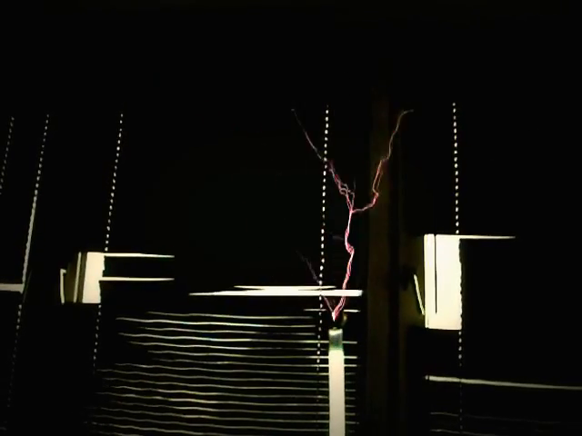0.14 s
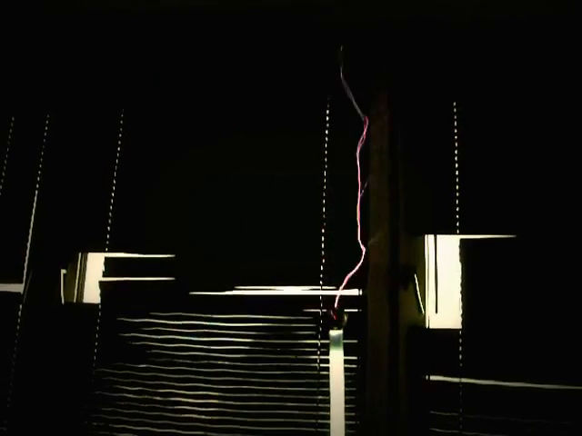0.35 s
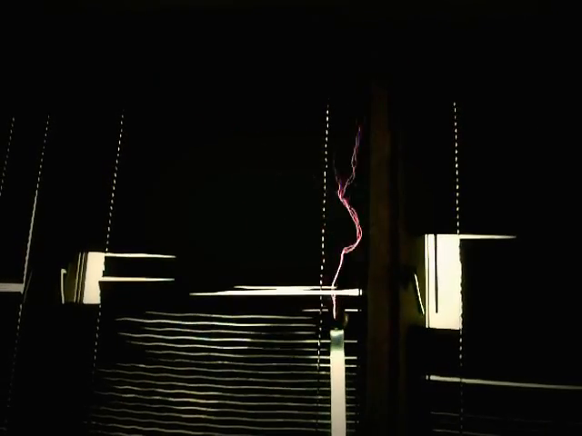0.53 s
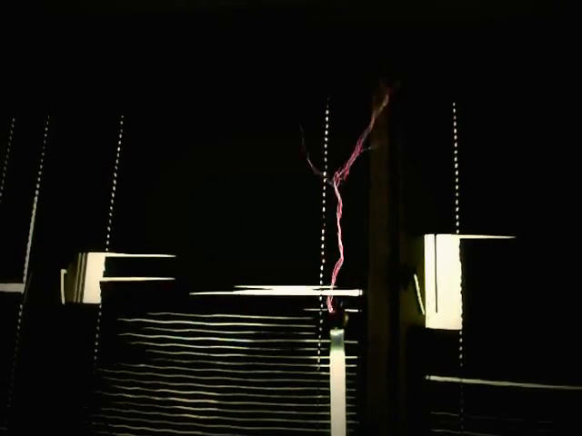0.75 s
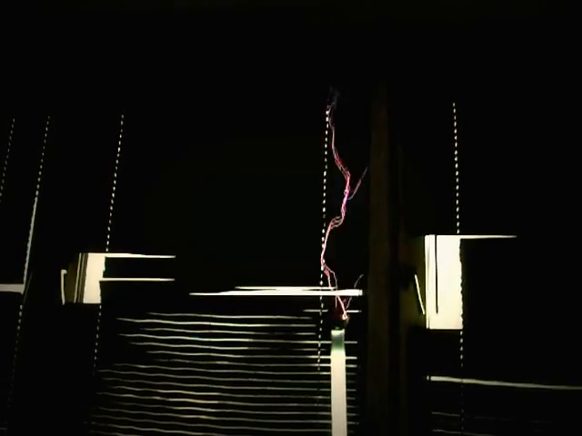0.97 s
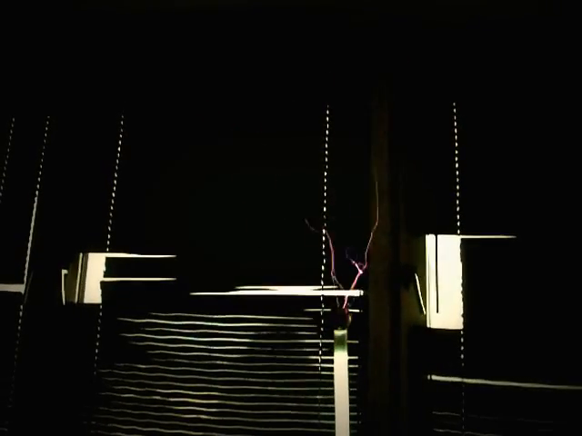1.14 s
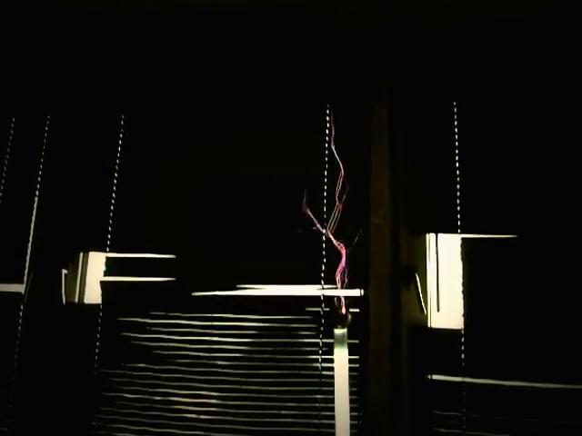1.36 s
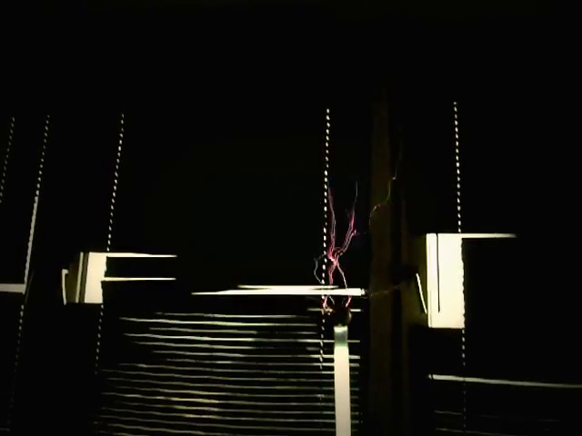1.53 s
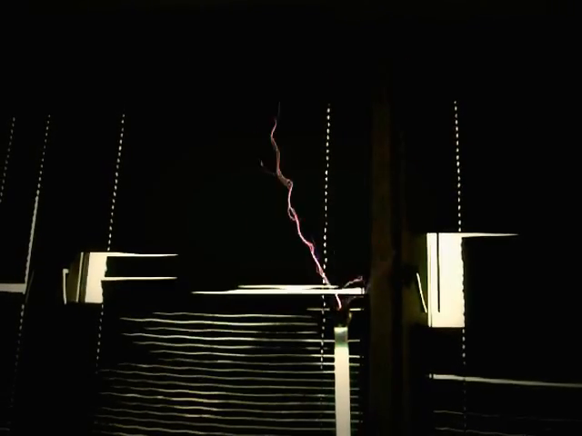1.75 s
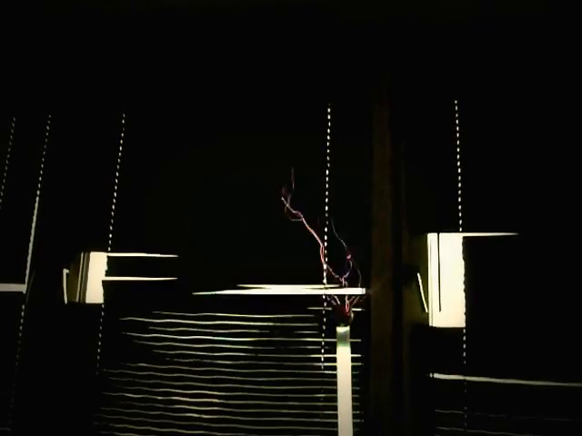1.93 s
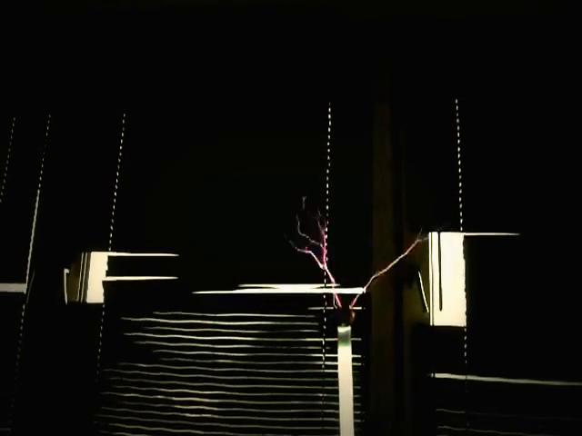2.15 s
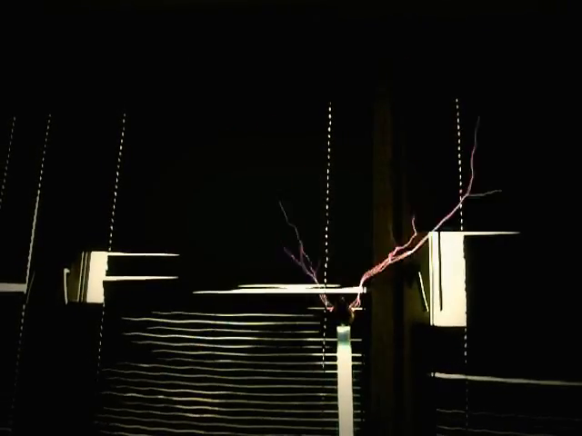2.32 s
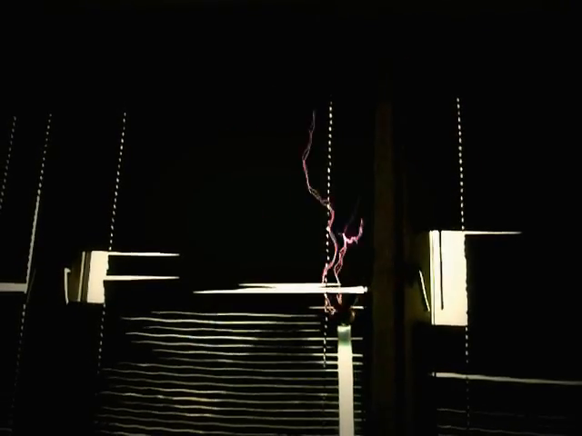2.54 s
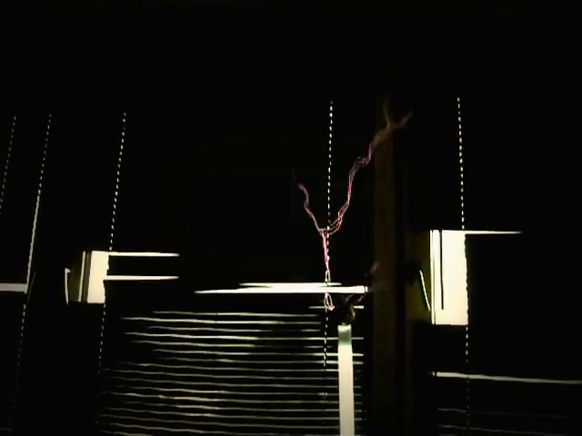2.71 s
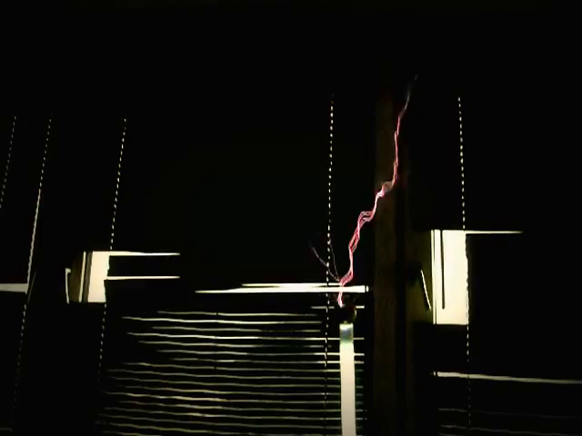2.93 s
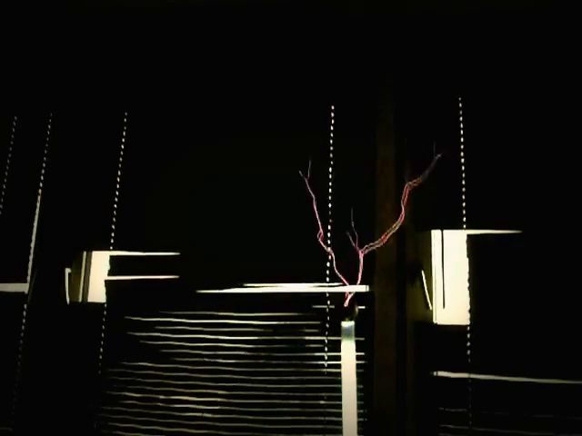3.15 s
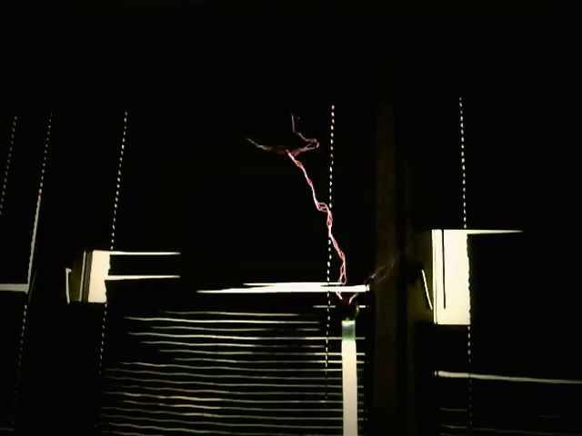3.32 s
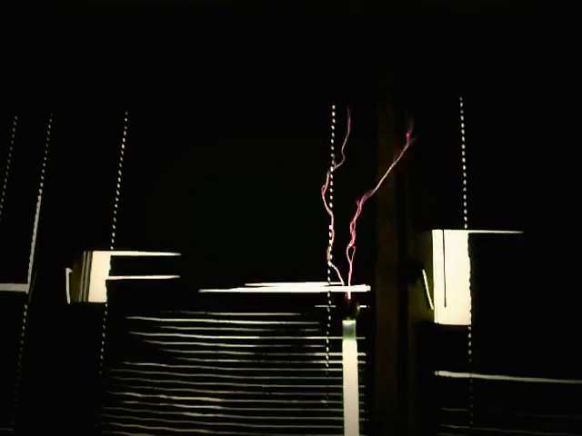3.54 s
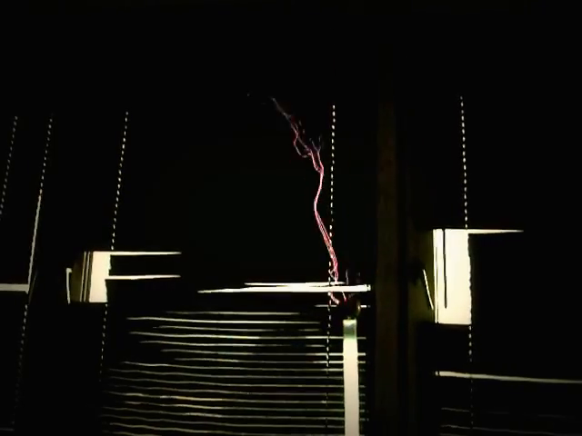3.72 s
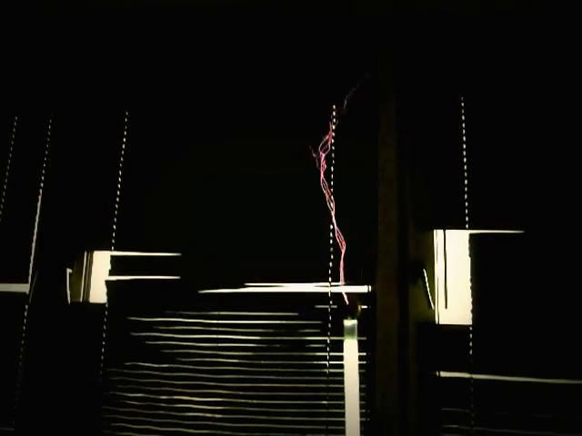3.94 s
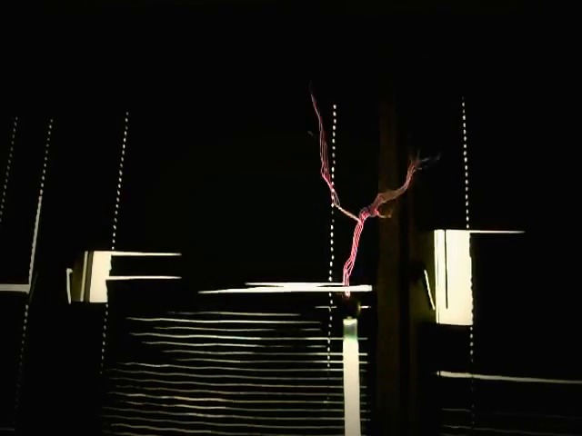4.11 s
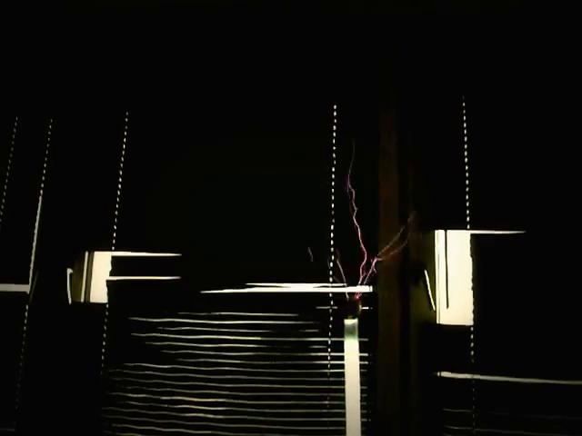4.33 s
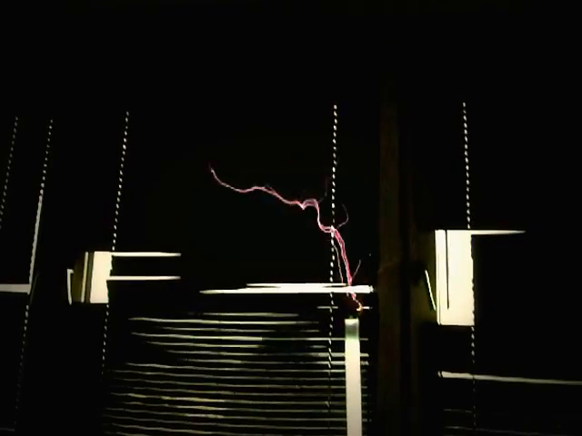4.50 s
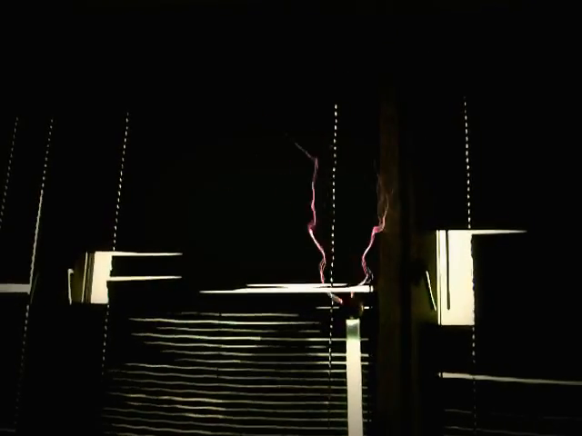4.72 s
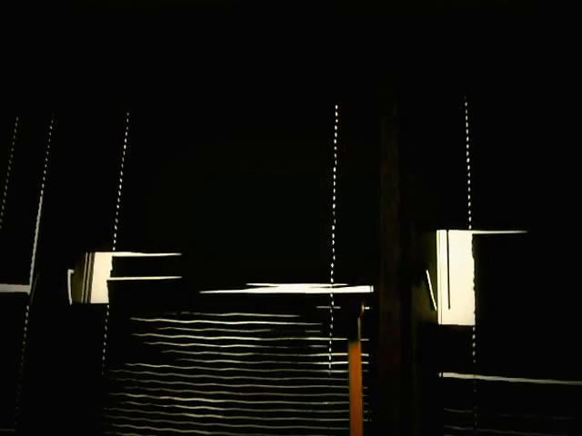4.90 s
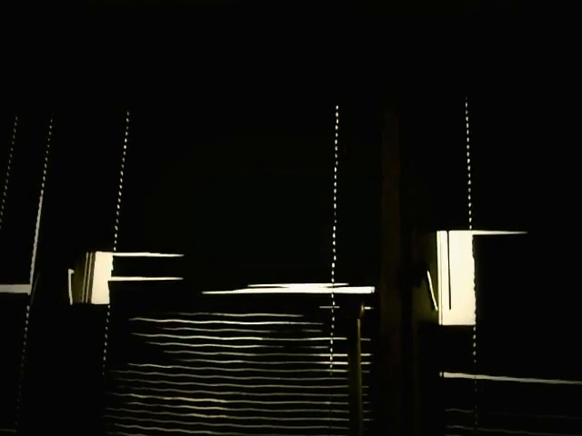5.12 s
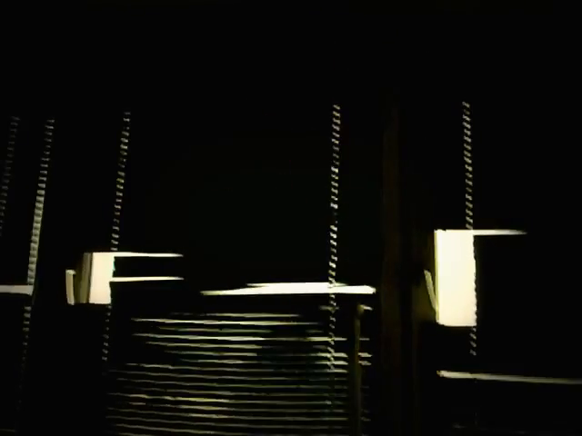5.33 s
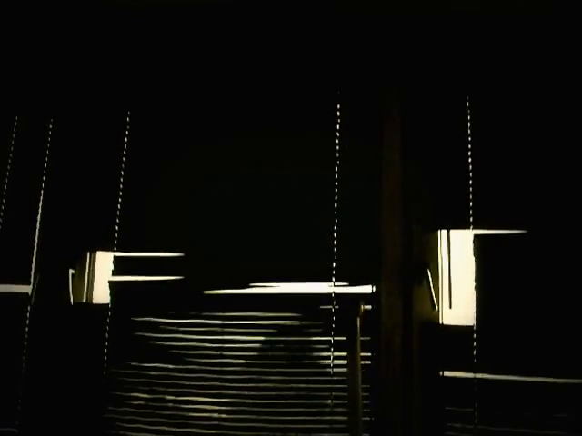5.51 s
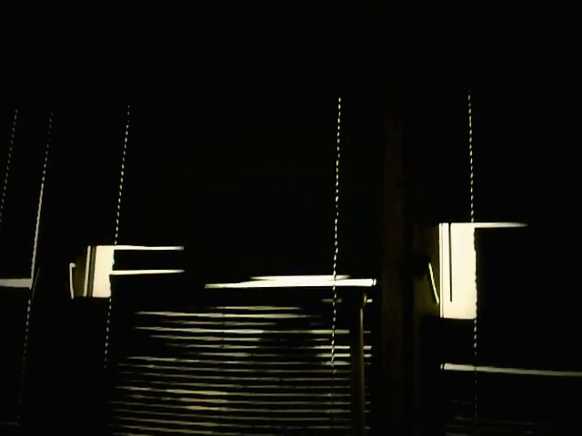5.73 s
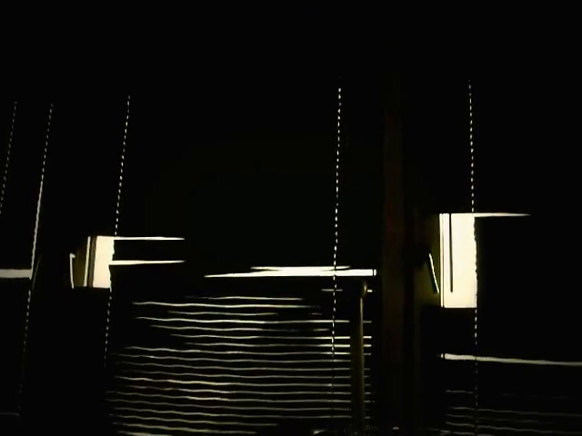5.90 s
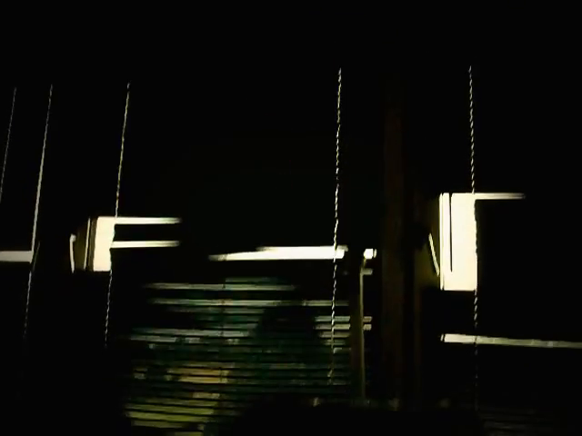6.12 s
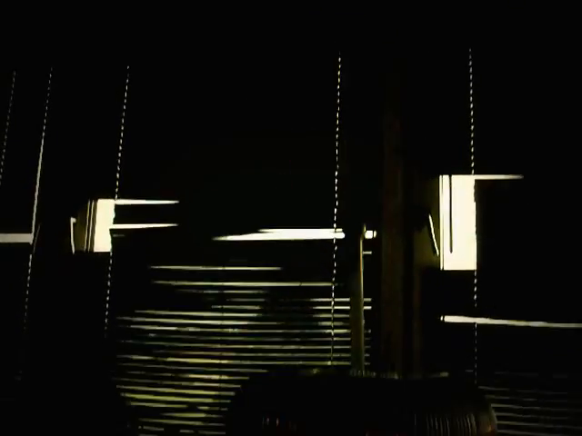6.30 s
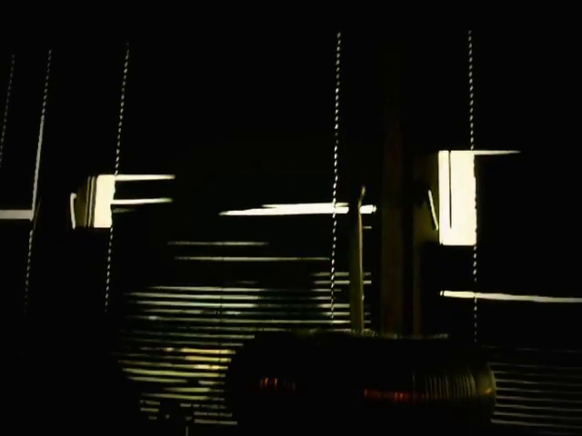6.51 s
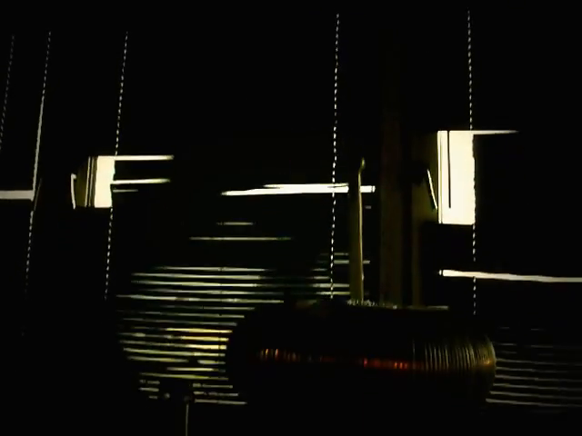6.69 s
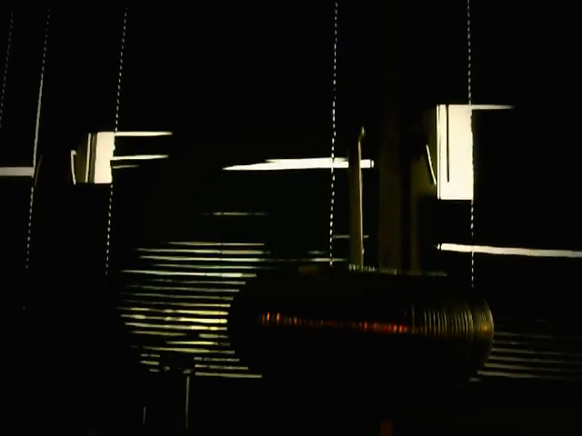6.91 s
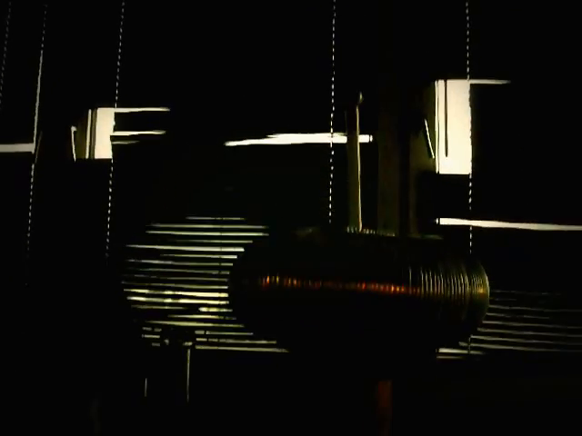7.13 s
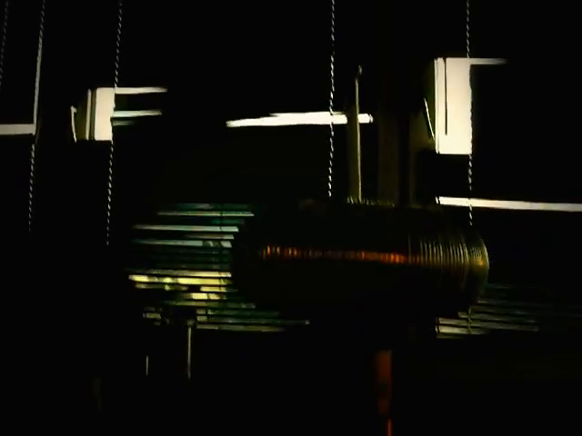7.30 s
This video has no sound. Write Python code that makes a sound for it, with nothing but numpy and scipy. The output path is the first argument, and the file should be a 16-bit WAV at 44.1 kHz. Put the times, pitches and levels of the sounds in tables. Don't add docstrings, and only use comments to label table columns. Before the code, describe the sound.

A homemade high-voltage coil throws branching sparks indoors. From the start a continuous raw buzz, a hundred sharp bangs a second, rasps with bright treble, flaring into hard cracks and sinking to a hissy blur as the streamers swing. Just before five seconds it is switched off; a brief reverberant tail dies, leaving only faint electronic hiss and a low flutter. Small hard-walled room, single microphone, peaky treble, no sound at the very top.

```python
import sys
import numpy as np
from scipy import signal
from scipy.fft import rfft, irfft, next_fast_len
from scipy.io import wavfile
from scipy.ndimage import uniform_filter1d

SR = 44100
rng = np.random.default_rng(int(sys.argv[2]) if len(sys.argv) > 2 else 0)


def master_out(mix):
    frames = np.transpose(np.atleast_2d(mix))
    ceiling = np.clip(frames, -1, 1)
    pcm = np.round(ceiling * 32767).astype(np.int16)
    wavfile.write(sys.argv[1], SR, pcm)


def invert_db(level):
    return 10 ** (np.asarray(level, dtype=float) / 20)


N = 324248
PULSE_SAMPLES, LEAD_SAMPLES = 1024, 64


def evened(x):
    return x / np.sqrt(np.mean(x ** 2) + 1e-20)


def read(points, hz):
    f, value = np.transpose(points)
    return np.interp(np.log(hz + 1), np.log(f + 1), value)


def causal(db):
    log_gain = np.log(invert_db(np.maximum(db, -70)))
    circle = np.concatenate([log_gain, log_gain[-2:0:-1]])
    return np.exp(np.conj(signal.hilbert(circle)))[:len(db)]


def delay(ms, hz):
    return np.exp(-2j * np.pi * hz * np.asarray(ms)[..., None] / 1000)


def during(t, start, length, edge):
    return (np.tanh((t - start) / edge) - np.tanh((t - start - length) / edge)) / 2


def place(times, spectra):
    nearest = np.round(times * SR)
    fraction_ms = (times * SR - nearest) / SR * 1000
    spectra = spectra * delay(fraction_ms, np.fft.rfftfreq(PULSE_SAMPLES, 1 / SR))
    pulses = np.roll(irfft(spectra, PULSE_SAMPLES), LEAD_SAMPLES, axis=1)
    at = nearest.astype(int)[:, None] + np.arange(PULSE_SAMPLES) + SR - LEAD_SAMPLES
    return np.bincount(at.ravel(), pulses.ravel(), N + SR)[:N + SR]


# start_s, length_s, gain_db, treble_gain_db
SWINGS = [(0.2, 0.099, 2.5, -3), (0.335, 0.3, 10.5, -10.5), (0.616, 0.25, 7.5, -4), (0.744, 0.062, 0.5, 12),
          (0.872, 0.12, 11.5, 2.5), (0.993, 0.14, 10, 2), (1.08, 0.11, 7, 1), (1.232, 0.15, 2, -0.5),
          (1.433, 0.13, 5, 10), (1.657, 0.19, 10.5, 3), (1.852, 0.24, 8, 2), (2.082, 0.34, 7.5, -3),
          (2.439, 0.2, 4.5, 7), (2.649, 0.13, 5.5, -2), (2.874, 0.15, -1, 5), (3.038, 0.2, 3.5, 2.5),
          (3.254, 0.29, 0, 4), (3.549, 0.12, 3.5, 2.5), (3.681, 0.38, 6.5, 5.5), (4.056, 0.064, 13, 6),
          (4.128, 0.27, 10, 6), (4.409, 0.065, 5, 0.5), (4.625, 0.23, 0.5, -2.5), (4.869, 0.113, 5.5, 16.5)]
TURN_S, ARCH = .013, 0.32


def facing(slots):
    start, length, *gains_db = np.transpose(SWINGS)
    start, length = start[:, None], length[:, None]
    arch = 1 + ARCH * (1 / 3 - np.clip(2 * (slots - start) / length - 1, -1, 1) ** 2)
    return np.array(gains_db) @ (arch * during(slots, start, length, TURN_S))


# start_s, loss_db
MISFIRES = [(0.19, -3), (0.28, -8), (0.3, -13), (0.31, -4), (0.36, 0.5), (0.54, -3), (0.6, -5), (0.61, 0.5),
            (0.73, -0.5), (0.86, -4), (0.89, 2), (1.02, 0), (1.11, -1), (1.2, -6), (1.21, -7), (1.4, -7.5),
            (1.54, -3.5), (1.55, -7), (1.6, -3.5), (1.61, -5), (1.63, -4.5), (1.83, -5.5), (2.01, -6),
            (2.02, -5.5), (2.24, -7), (2.3, -6.5), (2.5, 0.5), (2.55, -6), (2.56, -3), (2.76, -4),
            (3.02, -6), (3.1, -2), (3.6, -4.5), (4.04, -5), (4.09, -4), (4.26, -11), (4.37, -5.5),
            (4.39, -9.5), (4.4, -10), (4.64, -5.5), (4.69, -5)]
# start_s, strength_db, treble_lift_db
CRACKS = [(0.2306, -30, 1.5), (0.3809, -27.5, -5), (0.3913, -29.5, -0.5), (0.5518, -28, -3),
          (0.7515, -28.2, 5), (0.7612, -26, 1.5), (0.7718, -27, -2), (0.7813, -29, 6),
          (0.7906, -28.5, -1), (0.8016, -26, -3), (0.8116, -27, -2), (0.941, -26, -5),
          (1.001, -28.5, 4.9), (1.0116, -30.5, 2.5), (1.091, -25.5, -0.5), (1.1014, -26, -2.5),
          (1.1218, -25.5, -5.5), (1.1308, -26.5, -6), (1.1614, -28.5, 3), (1.172, -27, 0.5),
          (1.4612, -28.5, -3), (1.4813, -27.5, 1.3), (1.4907, -28.9, 1.0), (1.5119, -28, 2.8),
          (1.5213, -29.5, -1.5), (1.6517, -31, -1.5), (1.6908, -23, -12), (1.7016, -26, 2.5),
          (1.7111, -27.5, -1.5), (1.721, -26, -7.0), (1.731, -26.5, -4), (1.742, -23.5, -7),
          (1.7513, -23, -6.5), (1.7609, -22.5, -5), (1.7713, -27.5, -2), (1.7813, -22, -5),
          (1.7914, -23, -3.0), (1.8014, -23.5, -5), (1.811, -26.5, -6), (1.821, -26, -1),
          (1.8412, -24.5, -3), (1.8516, -24, -7.4), (1.8809, -25.3, -6.5), (1.9017, -27.5, -2.5),
          (1.9117, -25.5, -4), (1.922, -26.5, -5.5), (1.9316, -23.5, -8.0), (1.941, -25, -3.5),
          (1.9507, -24.5, -3), (1.9611, -23.5, -2.8), (1.972, -26.5, -1.7), (1.981, -25.5, -0.3),
          (1.992, -23, -8.0), (2.002, -26.5, -4), (2.0314, -23, -6.0), (2.052, -27.5, -1),
          (2.2718, -30.5, 3.5), (2.6727, -25.1, -7.3), (2.6817, -25.5, -7.5), (2.6917, -22.5, -3),
          (2.701, -25, -3), (2.7124, -24.5, -5), (2.7216, -28.5, -0.5), (2.7518, -27.0, -4),
               (3.0411, -29, -2.5), (3.051, -26, -5), (3.0608, -25, -5), (3.0716, -33, 5.8),
               (3.1117, -33, 4), (3.1215, -29, 0.4), (3.1618, -26, -11.5), (3.1713, -27, -0.2),
               (3.192, -38.5, 15.5), (3.2918, -30, 4), (3.6919, -31, 4), (3.712, -37, 14),
               (3.742, -32.5, 4), (3.7716, -26.8, 0), (3.7806, -25, -3.5), (3.792, -28, -2),
               (3.8018, -30.5, 2.1), (3.821, -29.5, 2.5), (3.8309, -29.5, -0.7), (3.8418, -27.2, 2),
               (3.8519, -27.8, 2.2), (3.8614, -30.5, 6), (3.872, -29.5, 1), (3.8812, -28, 3.2),
               (3.9409, -31.9, 7.2), (3.952, -30.5, 5.5), (3.971, -34.5, 11), (3.981, -29, 5),
               (4.0016, -31.5, 6.5), (4.0116, -32.5, 8), (4.0815, -29.0, 1.5), (4.1015, -30.5, 5),
               (4.1124, -33.5, 7.5), (4.1218, -29, 3.5), (4.1319, -28.5, 2.5), (4.1415, -23.5, -1.5),
               (4.1508, -28, 2.5), (4.1615, -26.5, -1.6), (4.1825, -25, -2), (4.1917, -24, -3.5),
               (4.201, -25, -3), (4.212, -25, -0.7), (4.2417, -25, -5.5), (4.2722, -23, -2),
               (4.2812, -22.5, -6.5), (4.2916, -26, -5.5), (4.3023, -24.5, -3), (4.3108, -25, -7.5),
               (4.3214, -24.1, -10), (4.3318, -24.5, -7.5), (4.3421, -23, -2.5), (4.3521, -26.5, -3.5),
               (4.3616, -23.5, -4), (4.3815, -28.5, 2), (4.652, -32, 8.5), (4.6615, -30.5, 6),
          (0.1111, -36, -1), (0.1718, -36, 4.5), (0.2517, -31.5, 1.5), (0.2608, -31.4, 2.5),
               (0.271, -32, -5), (0.3314, -36.5, 3.5), (0.3407, -36, 6), (0.351, -32, 1.4),
               (0.3723, -32, -9.5), (0.401, -26.5, -3), (0.4111, -24.5, -5.5), (0.4212, -27, 0.6),
               (0.432, -25.5, -7.5), (0.4406, -27, -1.0), (0.4513, -25.6, -6), (0.461, -25, -10.5),
               (0.4716, -29.5, -15), (0.4814, -28.5, -7), (0.4912, -24.5, -12.8), (0.502, -30, -8.5),
               (0.5116, -28, -5), (0.5209, -27.5, -10.5), (0.531, -27, -12.5), (0.5614, -29, -5),
               (0.5708, -28.5, -8.5), (0.5816, -28, -5), (0.6213, -34.5, 5), (0.6515, -27.5, -10.5),
               (0.6606, -33, -6), (0.6702, -28.5, -6.6), (0.6819, -27.5, -3.5), (0.6912, -30, -2.5),
               (0.702, -32.5, -3.5), (0.7109, -27.5, -3), (0.7217, -31.5, -1.8), (0.7413, -29.5, -2),
               (0.8208, -30.5, -9.5), (0.8321, -30, 1), (0.881, -29.5, 3), (0.901, -30, -4),
               (0.912, -27.5, -6), (0.9212, -23.5, -9), (0.9309, -22, -3), (0.951, -28, -6),
               (0.9612, -34, 1), (0.9717, -25.5, -2.4), (0.981, -29.1, -0.5), (0.9926, -30.5, -1),
               (1.0316, -29, 0.5), (1.0515, -30, 2.5), (1.0614, -31, 6), (1.0742, -27.5, 3),
               (1.079, -30.2, 2.1), (1.1518, -29.5, -0.8), (1.2213, -33.5, 3.5),
          (1.2713, -29, -5), (1.332, -30.5, -4), (1.3614, -32.6, 3.6), (1.4408, -29, -11),
                (1.452, -32, 0), (1.4713, -34, 3), (1.5009, -28.5, -2.1), (1.5318, -29.5, 4.5),
                (1.6212, -29, -1.4), (1.671, -27.2, -7), (1.6813, -28.5, -3.5), (1.8613, -27.4, -5.5),
                (1.8717, -26.5, -7.5), (1.8912, -32.5, 2.5), (2.042, -30.5, -4.5), (2.0616, -26.5, -9.8),
                (2.0711, -28, -2.5), (2.102, -28, -0.5), (2.1115, -31.5, 2.5), (2.122, -27, -3.0),
                (2.1419, -28, -4.1), (2.151, -29.5, 3.5), (2.1611, -34, 3.5), (2.171, -35, 5.8),
                (2.2119, -26, -6), (2.2605, -31.6, -0.2), (2.2927, -26, -3.9), (2.3618, -26.5, -7.5),
                (2.4008, -33, 1), (2.421, -33, -3.5), (2.432, -28.5, 1), (2.4514, -31, 4), (2.4618, -32, 3),
                (2.4807, -38, 12), (2.4918, -34.6, 8), (2.5122, -33.5, 4), (2.5317, -29.5, 3),
                (2.592, -38, 13.5), (2.6611, -27, -3.5), (2.7318, -26.5, -10), (2.7418, -30.5, -2),
                (2.7714, -28, -5.5), (2.8014, -38, 14.4), (2.8113, -34.5, 8), (2.9019, -30, 0),
                (2.9313, -35.5, 1.4), (2.941, -33.5, 5), (2.9617, -34.5, 7), (2.9717, -32, 5.2),
                (2.9816, -29.5, -1), (2.991, -29, -1.8), (3.0019, -37, 5), (3.0111, -31.5, 2),
                (3.0812, -32.5, -6), (3.0914, -29, -4),
          (3.1307, -29.6, -1.7), (3.1417, -28.0, -2), (3.1521, -28.5, -1), (3.202, -31, -2.0),
              (3.2318, -32.5, 5), (3.241, -39.5, 10.0), (3.262, -30.5, 3.5), (3.2717, -33, 4.5),
              (3.2816, -31.0, 2.3), (3.3012, -35, 11.5), (3.3126, -34.5, 6), (3.3203, -32.5, 2),
              (3.3318, -34, 4), (3.342, -40.5, 13.5), (3.3617, -33.5, 5.7), (3.3713, -31, 3),
              (3.3812, -35.5, 3.5), (3.3916, -31.5, 2.5), (3.402, -33, 2.5), (3.4121, -32, 3),
              (3.421, -33.5, 3.5), (3.4318, -36.5, 9), (3.4414, -32, 3), (3.4614, -34, 3),
              (3.4818, -34.5, 4), (3.511, -37.5, 8), (3.5301, -36.5, 8), (3.5714, -33.5, 5),
              (3.5803, -34.5, 5), (3.6604, -31, 0.5), (3.6816, -33, 5), (3.702, -34, 5.5),
              (3.7216, -29.5, 6), (3.7319, -27.5, 1), (3.7515, -29.5, 0.5), (3.762, -27, -3.3),
              (3.891, -30.5, 0.4), (3.9214, -28, -2.1), (3.9315, -30.7, 3.5), (3.9616, -36.2, 10.5),
              (3.9917, -31, 4.5), (4.022, -32, 6.1), (4.0322, -29.5, 6.1), (4.0718, -32.5, 2.0),
              (4.4106, -32, 1), (4.4212, -28.5, -5.8), (4.4433, -28.5, -10), (4.622, -35.6, 6.5),
              (4.7729, -30, 3), (4.8113, -29.5, 0.3), (4.8218, -33.5, 7), (4.8408, -31, 4),
              (4.8526, -33.5, 4), (4.8612, -37.5, 6.5), (4.8714, -31.5, 2)]
# start_s, strength_db, treble_lift_db, push_db
FAT_STRIKES = [(1.1411, -23.5, -3, -58.5), (3.1805, -32, 4.5, -65), (4.1715, -26, -1, -76),
               (3.9016, -26.5, 3, -44.5), (3.9124, -26, 3.5, -46.5), (4.2215, -26.5, 1.5, -50),
               (4.2314, -26, 2.5, -39.5), (4.2519, -28, 5.5, -45.5), (4.8814, -38.5, 11, -65.5),
               (4.8916, -35, 10, -42), (4.9015, -28.5, 5, -56.5), (4.9115, -28, 5, -37),
               (4.9219, -26.5, 4.5, -35), (4.9326, -22.5, -1.5, -60)]
BANGS_PER_S, RUN_UP_BANGS = 100, 40
AWAY_DB, AWAY_TREBLE_DB = -34, -31.5
PLAIN_TOP_DB, PLAIN_TREBLE_TOP_DB = -30.5, -31.5
LAG_MS, LAG_MS_PER_S, JITTER_MS = 1.3, .05, .36
TREMBLE_MS = .04
NO_PUSH_DB = -90
STRAIGHT_PER_DB = -0.5


def bangs():
    slots = np.arange(-RUN_UP_BANGS, round(FAT_STRIKES[-1][0] * BANGS_PER_S) + 1) / BANGS_PER_S
    gain_db, treble_db = facing(slots)
    late, strong, bright = np.clip(rng.standard_normal((len(slots), 3)).T, -1.8, 1.0)
    times = slots + (LAG_MS + LAG_MS_PER_S * slots + JITTER_MS * late) / 1000
    strength_db = np.minimum(AWAY_DB + gain_db + 1.3 * strong, PLAIN_TOP_DB)
    lift_db = AWAY_TREBLE_DB + treble_db - AWAY_DB - gain_db + 1.6 * bright
    lift_db = np.minimum(lift_db, PLAIN_TREBLE_TOP_DB - strength_db)
    crooked = np.clip(3 - STRAIGHT_PER_DB * gain_db, .3, 1)
    push_db = np.full(len(slots), float(NO_PUSH_DB))
    rows = np.transpose([times, strength_db, lift_db, push_db, crooked])

    def slot(start_s):
        return RUN_UP_BANGS + round(start_s * BANGS_PER_S)

    for start_s, loss_db in MISFIRES:
        rows[slot(start_s), 1] += loss_db
    for crack in CRACKS:
        rows[slot(crack[0])] = (*crack, NO_PUSH_DB, .5)
    for strike in FAT_STRIKES:
        rows[slot(strike[0])] = (*strike, .45)
    rows[:, 0] += TREMBLE_MS / 1000 * bright
    return rows.T


def streamer(count, hz, spread_ms, branch_db):
    late, size = rng.random((count, 6, 2)).T
    later = (np.arange(6) > 0)[:, None]
    piece = np.where(later, invert_db(branch_db) * 2 * size, 1)
    late_ms = -spread_ms * np.log(1 - .95 * late) * later
    total = (piece[..., None] * delay(late_ms, hz)).sum(0)
    return total / np.linalg.norm(piece, axis=0)[:, None]


# start_s, centre_hz, lift_db
COLOUR = [(0.0, 4240, 2), (0.3, 4160, 7.5), (0.44, 3350, 2), (0.48, 3840, 3.5), (0.78, 3440, 1.5),
          (0.89, 4250, -0.5), (1.4, 3590, 6), (1.46, 4720, 5), (1.64, 3570, 2), (2.44, 4010, -1),
          (2.54, 3620, 2), (2.93, 4440, 1.5), (2.97, 3820, 2.5), (3.45, 4380, 4.5), (4.19, 3750, 2.5),
          (4.9, 4320, 0.5)]
DIP_HZ, DIP_PER_DB = 1500, .4


def beam(times, strength_db, lift_db, hz):
    treble = np.clip((hz - 5300) / 3200, 0, 1)
    beam_db = (strength_db[:, None] + 30.5) * np.clip(0.067 + hz / 2500, 0, 1)
    beam_db = beam_db + (lift_db[:, None] + 0.5) * treble
    start_s, centre_hz, band_db = np.transpose(COLOUR)
    octaves = np.log2((hz + 1) / np.interp(times, start_s, centre_hz)[:, None])
    beam_db = beam_db + np.interp(times, start_s, band_db)[:, None] * np.exp(-(octaves / 0.63) ** 2)
    dip_db = DIP_PER_DB * np.minimum(strength_db + 28.5, 0)
    return beam_db + dip_db[:, None] * np.exp(-(np.log2((hz + 1) / DIP_HZ) / 0.68) ** 2)


# pitch_hz, level_db (per Hz)
SHOCK = [(40, -34), (110, -30), (200, -33), (330, -11.5), (900, -5), (1700, -8), (3300, -3.5), (4400, -7.5),
         (6500, -3), (7500, -2.5), (8800, 1.5), (10300, 1.5), (20000, 8)]


def shock_pulse(hz):
    shock = causal(read(SHOCK, hz)) * np.exp(1.2j * np.clip(hz / 1500, 0, 1))
    return shock / np.linalg.norm(irfft(shock * (hz < 11000))) * 19.4


# delay_ms, level_db
ECHOES = [
    (.75, -16),
    (1.9, -18),
    (3.2, -16),
    (4.8, -9),
    (5.9, -14.5),
    (8.3, -13),
    (14.15, -11),
]
SKEW_RAD = 1.1


def direct(times, strength_db, lift_db, push_db, crooked, hz):
    count = len(times)
    beam_db = beam(times, strength_db, lift_db, hz)
    heard = invert_db(beam_db) * streamer(count, hz, .3 * crooked, -29.5 + 14 * crooked)
    ms, echo_db = np.transpose(ECHOES)
    wander_ms = ms + 0.08 * rng.standard_normal((count, len(ms)))
    treble = np.clip((hz - 5300) / 3200, 0, 1)
    echoes = (invert_db(echo_db)[:, None] * delay(wander_ms, hz)).sum(1) * invert_db(.5 * beam_db - 1.6 * treble)
    echoes = echoes * streamer(count, hz, .3, -14.5)
    skew = SKEW_RAD * evened(wander_ms[:, -1:] - ms[-1])
    heard = heard * np.exp(1j * skew * np.clip((hz - 3000) / 5000, 0, 1))
    puff = np.exp(-((np.arange(PULSE_SAMPLES) / SR - .0008) / 0.00027) ** 2)
    push = rfft(puff) * invert_db(push_db[:, None] + 11.5)
    return place(times, invert_db(-32.0) * shock_pulse(hz) * (heard + echoes) + push)


# pitch_hz, level_db (per Hz)
FIELD = [(40, -59), (110, -42.5), (210, -22.5), (400, -20.5), (1000, -13), (1700, -9), (3000, -6.5),
         (6500, -6), (7400, -4), (8700, 2.5), (10300, 1)]
# pitch_hz, t60_s
ROOM = [(100, 0.37), (260, 0.6), (700, 0.44), (1800, .43), (4800, .4), (9000, .33)]


def tail():
    hz, t, z = signal.stft(rng.standard_normal(SR), SR, nperseg=512)
    t60_s = read(ROOM, hz)[:, None]
    decay = invert_db(read(FIELD, hz)[:, None] - 60 * t / t60_s) / np.sqrt(t60_s)
    out = signal.istft(z * decay, SR, nperseg=512)[1][:SR]
    return out / np.linalg.norm(out) * np.clip(np.arange(SR) / SR / 0.0017, 0, 1)


# pitch_hz, level_db
ROOM_MODES = [(140, -19.5), (180, -18.5), (246.3, -20.5), (512, -15.5), (624.6, -8), (677.3, -9.5),
              (758, -16), (832, -17), (900, -12), (963, -14), (1045, -4.5), (1074, -7),
              (1250, -10.5), (1330, -15.5), (1385, -8), (1480, -10.5), (1540, -18), (1880, -6), (1970, -10),
             (2085, -11.5), (2290, -5.5), (2335, -7.5), (2470, -12.5), (2980, -7), (3320, -3)]
# pitch_hz, level_db
STEADY_MODES = [(299.2, -23), (400.2, -15), (500.5, -12.5)]


def ringing_modes():
    t = np.arange(SR) / SR
    wandering = ROOM_MODES
    groups = []
    for group in (wandering[0::2], wandering[1::2], STEADY_MODES):
        groups.append(sum(invert_db(db - 60 * t / (0.6 * read(ROOM, f))) * np.sin(2 * np.pi * f * t)
                          for f, db in group))
    high_pass = signal.butter(4, 125, "high", fs=SR, output="sos")
    return signal.sosfilt(high_pass, np.array(groups) * np.clip(t / 0.019, 0, 1))


PATHS = 8


def room(times, spectra, hz):
    blend = uniform_filter1d(rng.standard_normal((len(times), PATHS)), size=6, axis=0)
    blend = blend / np.linalg.norm(blend, axis=1, keepdims=True)
    short = np.clip(0.16 + hz / 1000, 0, 1)
    stays = np.sqrt(1 - short ** 2) * (1 - .7 * np.exp(-((hz - 200) / 45) ** 2))
    out = 0
    for share in blend.T:
        fed = (short * share[:, None] + stays / np.sqrt(PATHS)) * spectra
        out = out + signal.fftconvolve(place(times, fed), tail())
    feeds = (0.77 + 1.7 * blend[:, 0], 0.89 + 1.8 * blend[:, 1], np.ones(len(times)))
    for feed, mode in zip(feeds, ringing_modes()):
        out = out + invert_db(-51.5) * signal.fftconvolve(place(times, feed[:, None] * spectra), mode)
    return out[:N + SR]


FIELD_DB = -24


def coil():
    times, strength_db, lift_db, push_db, crooked = bangs()
    hz = np.fft.rfftfreq(PULSE_SAMPLES, 1 / SR)
    near = direct(times, strength_db, lift_db, push_db, crooked, hz)
    power = invert_db(FIELD_DB + 27.0 + 0.036 * (strength_db + 41.5))
    spectra = power[:, None] * streamer(len(times), hz, 0.397, -6.5)
    return (near + room(times, spectra, hz))[SR:]


# pitch_hz, level_db (per Hz)
HISS = [(29, -27), (50, 3), (95, -5), (139, -6.5), (376, -13), (731, -15.5), (1770, -20.5), (2320, -19),
        (2640, -21.5), (10000, -26), (13000, -59), (22000, -120)]
FLUTTER_DB = [-68.5, -76, -83]
HISS_DB, FLUTTER_HZ = -74, 20


def shaped_noise(shape):
    return irfft(rfft(rng.standard_normal(N)) * shape, N)


def hiss():
    hz = np.fft.rfftfreq(N, 1 / SR)
    noise = shaped_noise(invert_db(read(HISS, hz)))
    drift, swell = shaped_noise(hz < 5), shaped_noise(hz < 9)
    turn = 2 * np.pi * np.cumsum(FLUTTER_HZ * (1 + .09 * evened(drift))) / SR
    dips = sum(invert_db(db + 4.5) * np.cos((k + 1) * turn) for k, db in enumerate(FLUTTER_DB))
    slow = shaped_noise(np.exp(-((hz - 10) / 6) ** 2))
    flutter = invert_db(-71.5) * evened(slow) - dips * (1 + 0.3 * evened(swell))
    return invert_db(HISS_DB) * evened(noise) + flutter


# start_s, length_s, low_hz, top_hz
DROPOUTS = [
    (3.203, .032, 1, 310),
    (4.002, .022, 1, 180),
    (4.037, .021, 1, 560),
    (4.053, .005, 400, 900),
    (4.034, .036, 810, 940),
    (4.0, .026, 1540, 1670),
    (4.04, .025, 1500, 1660),
    (4.04, .006, 940, 1200),
]


def bands_lost(x):
    size, t = next_fast_len(N), np.arange(N) / SR
    hz = np.fft.rfftfreq(size, 1 / SR)
    for start_s, length_s, low_hz, top_hz in DROPOUTS[::-1]:
        lost = 1 / (1 + (hz / top_hz) ** 30) - 1 / (1 + (hz / low_hz) ** 30)
        x = x - irfft(rfft(x, size) * lost, size)[:, :N] * during(t, start_s, length_s, 0.0012)
    return x


def scene():
    return np.tile(coil() + hiss(), (2, 1))


# pitch_hz, level_db
EDGE = [(10200, 0.5), (10700, -8), (11050, -20.5), (11500, -81)]


def roll_off(x):
    return signal.sosfilt(signal.butter(12, 11600, fs=SR, output="sos"), x)


def record(dry):
    size = next_fast_len(N + PULSE_SAMPLES)
    edge = invert_db(read(EDGE, np.fft.rfftfreq(size, 1 / SR)))
    mix = irfft(rfft(bands_lost(dry), size) * edge, size)[:, :N]
    return roll_off(mix)


dry = scene()
out = record(dry)
master_out(out)
```